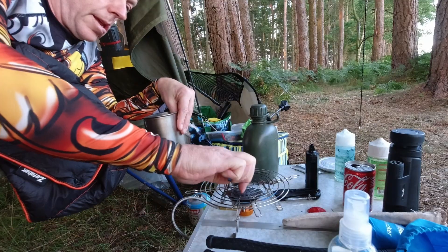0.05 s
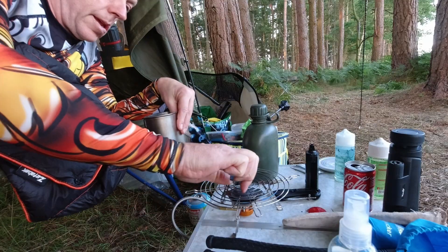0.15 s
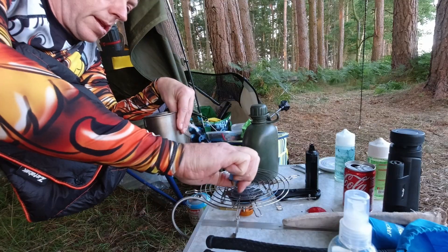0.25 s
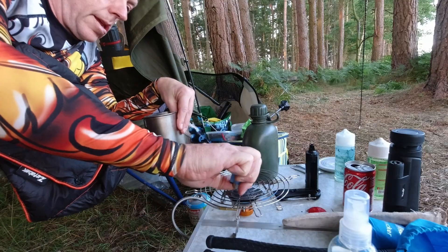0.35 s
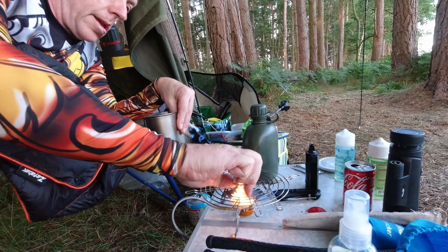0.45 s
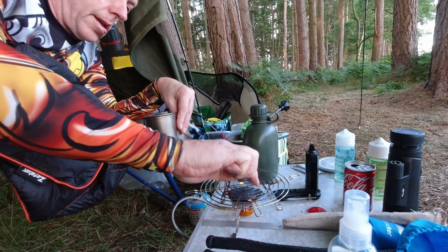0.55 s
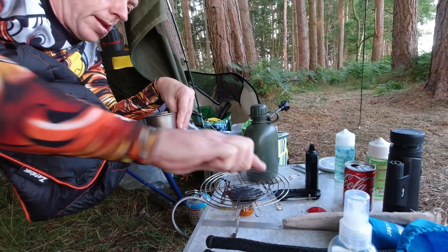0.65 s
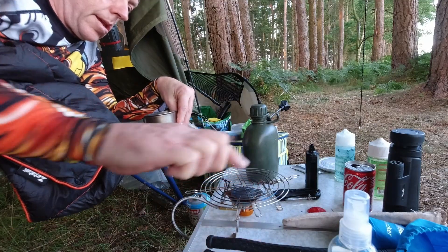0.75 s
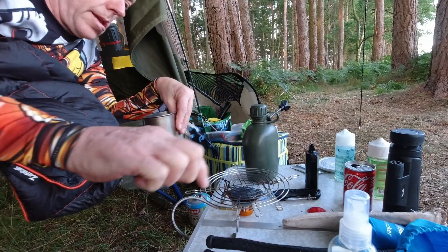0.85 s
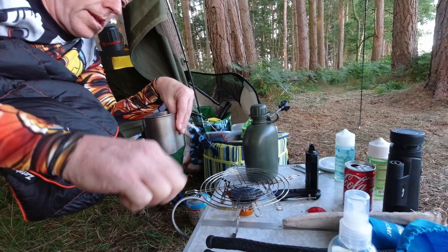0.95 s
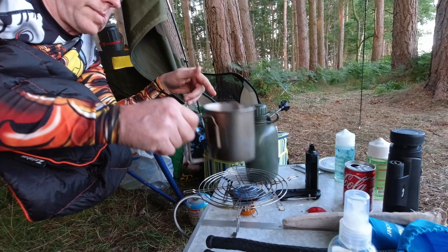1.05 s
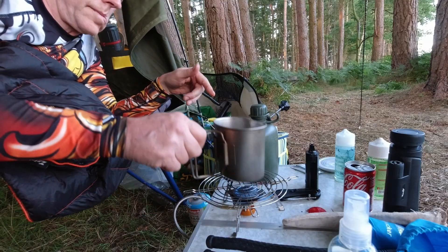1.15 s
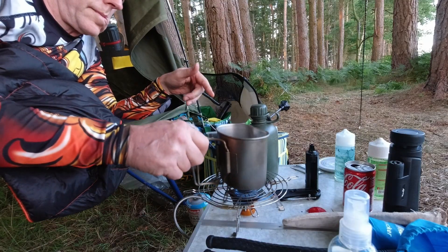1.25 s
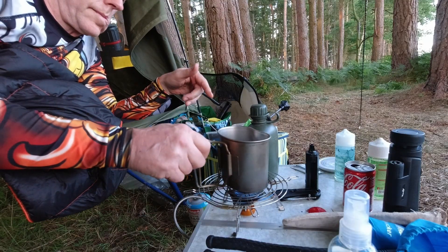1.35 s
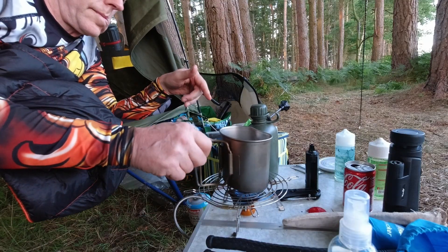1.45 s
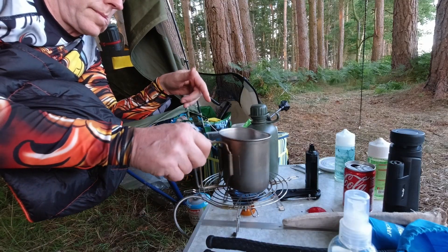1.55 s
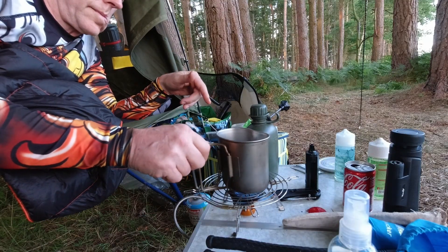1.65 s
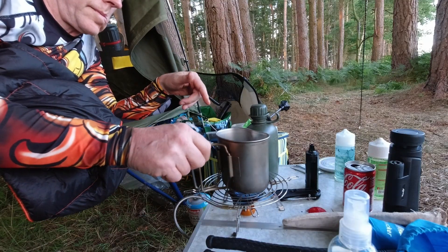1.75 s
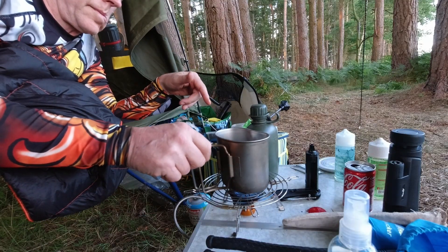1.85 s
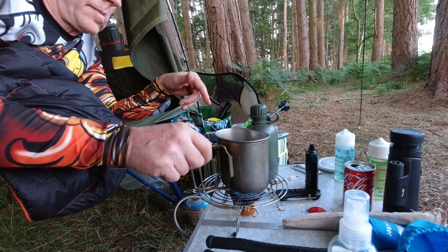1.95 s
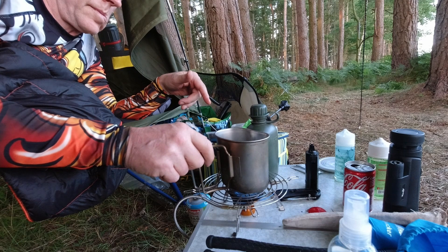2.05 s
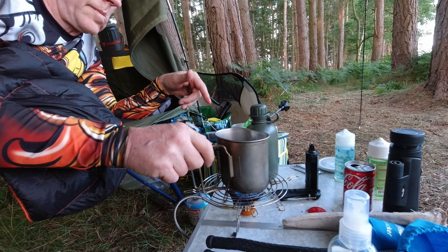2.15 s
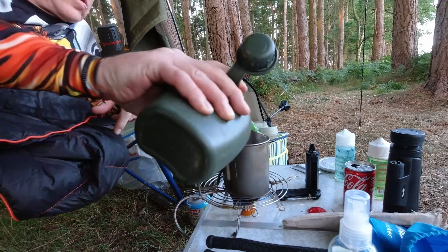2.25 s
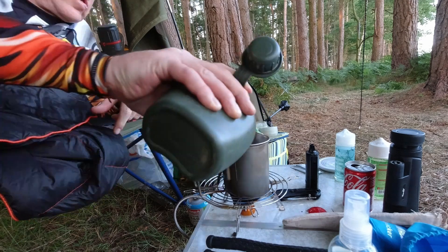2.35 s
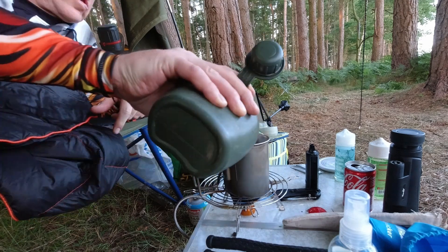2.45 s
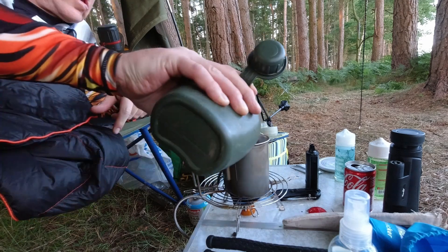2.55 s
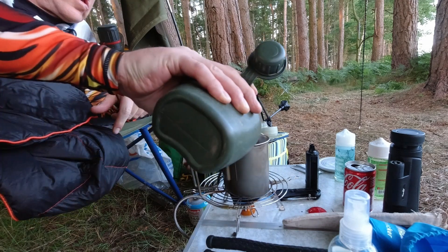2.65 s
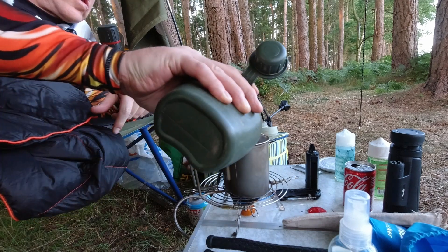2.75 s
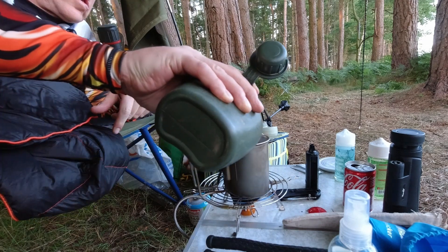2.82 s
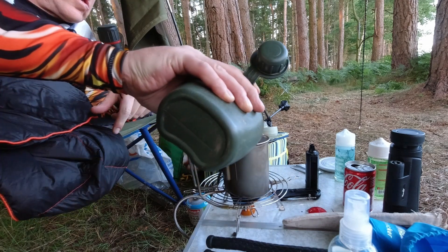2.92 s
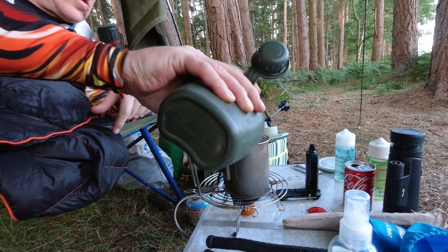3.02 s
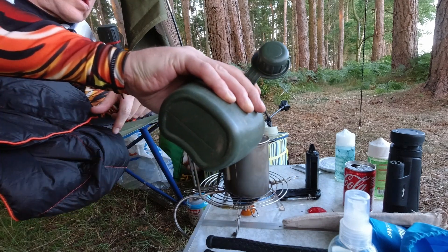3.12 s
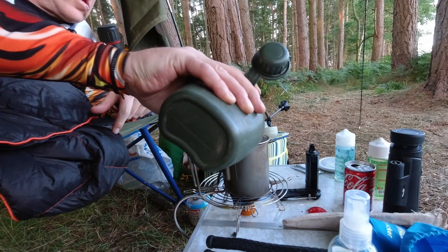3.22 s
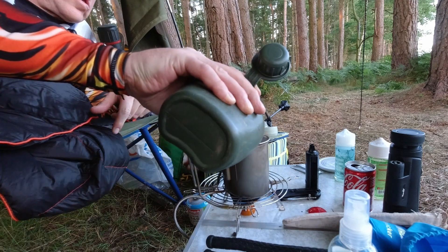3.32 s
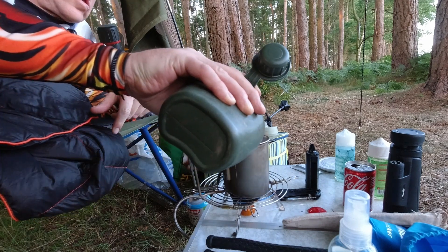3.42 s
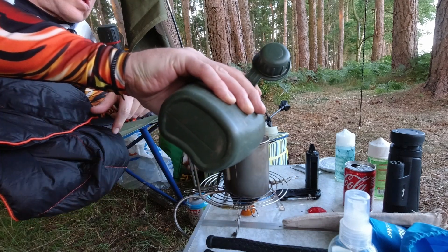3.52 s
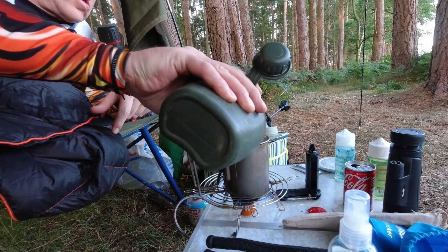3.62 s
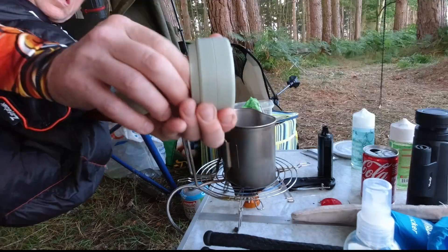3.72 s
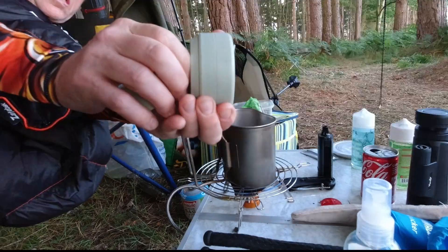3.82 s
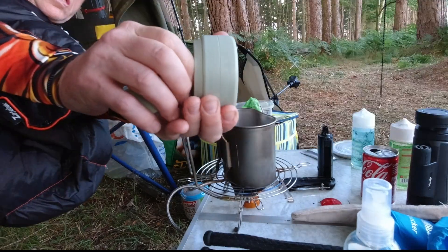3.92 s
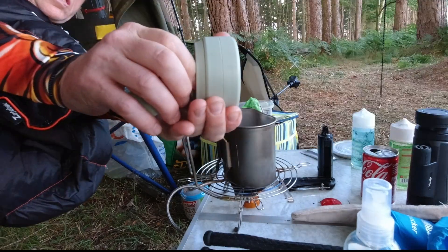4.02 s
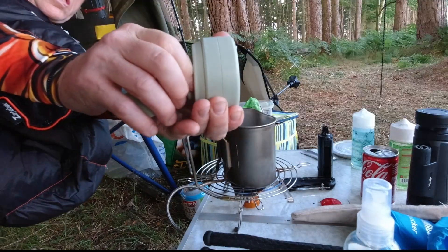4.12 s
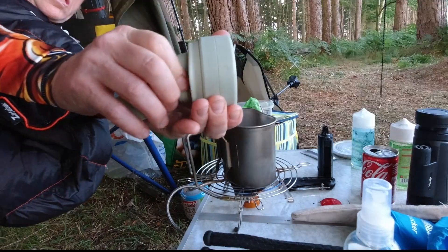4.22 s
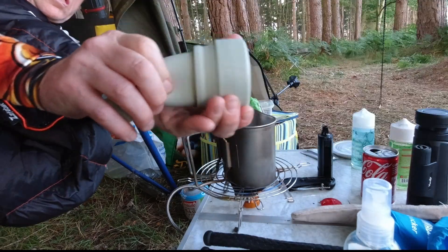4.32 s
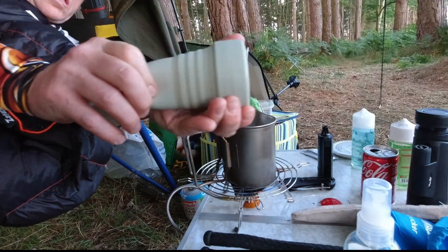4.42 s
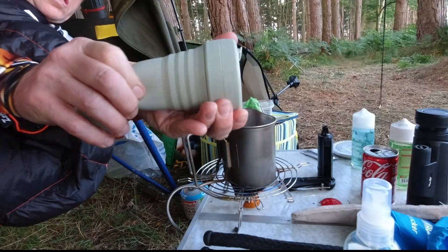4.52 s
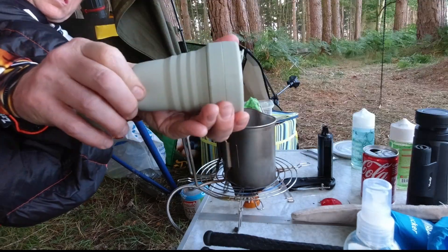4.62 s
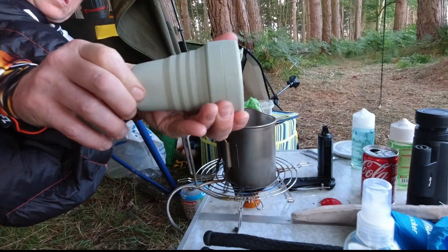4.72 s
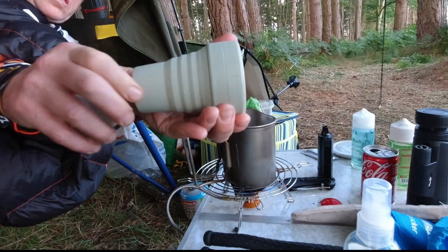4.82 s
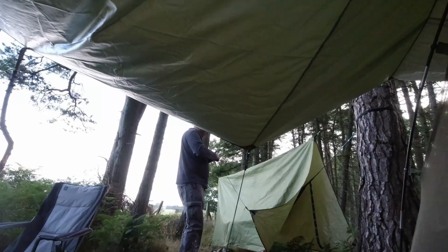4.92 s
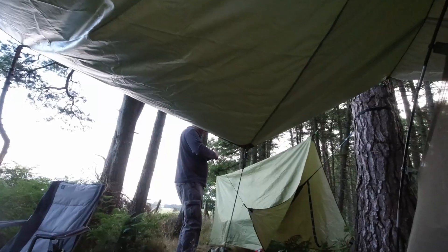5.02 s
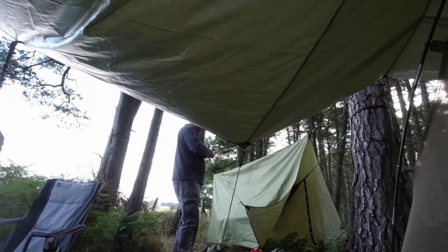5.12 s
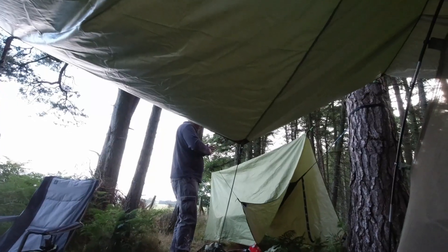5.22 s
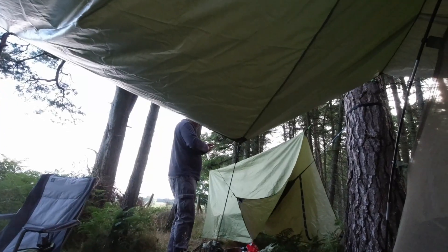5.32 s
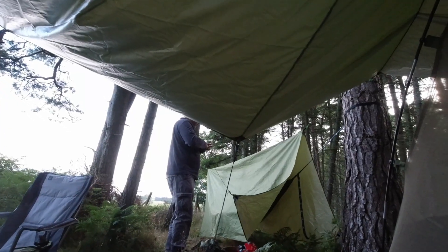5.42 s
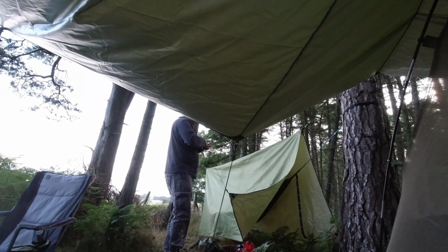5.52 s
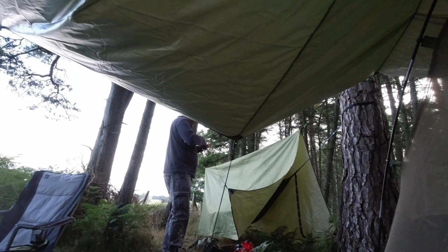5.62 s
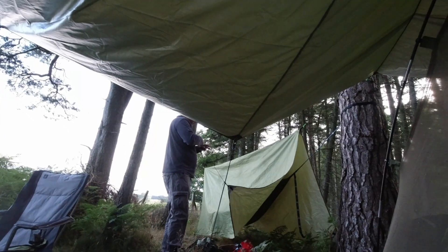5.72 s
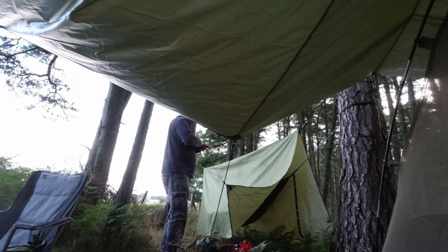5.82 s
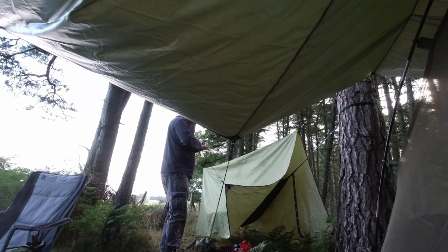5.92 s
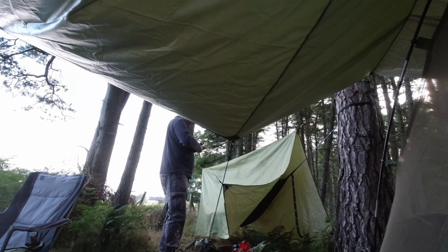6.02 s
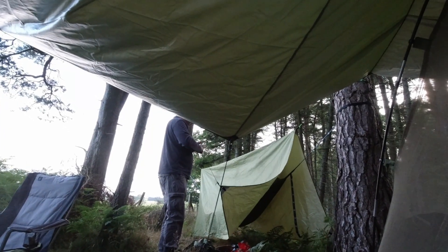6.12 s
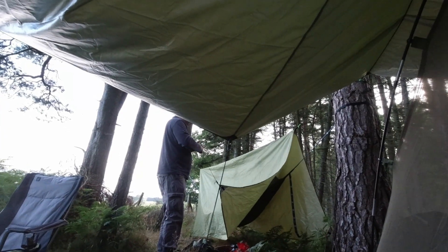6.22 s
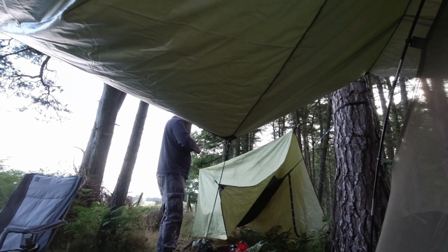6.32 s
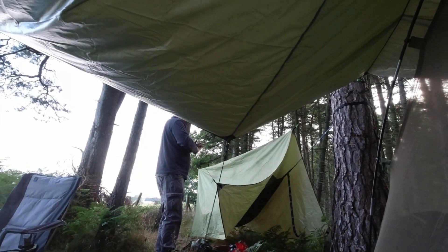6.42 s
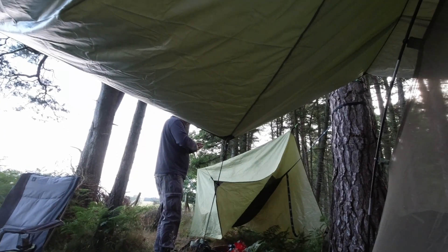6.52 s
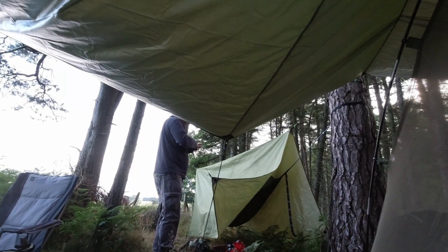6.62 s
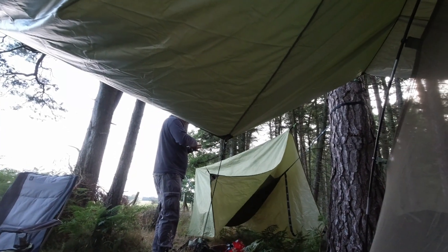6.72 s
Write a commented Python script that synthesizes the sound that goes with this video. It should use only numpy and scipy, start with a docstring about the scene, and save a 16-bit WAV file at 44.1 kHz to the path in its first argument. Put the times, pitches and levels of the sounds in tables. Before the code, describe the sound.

A gas stove lights with a click and soft whump, a metal mug clanks and scrapes, water glugs in, a rubber cup pops open.

```python
"""A far low roar and a faint hiss come first and lie under it all, with small ticks and rustling sleeves.
Then a gas stove is lit: shaped noise hisses and thumps. A metal mug is knocked and slid on a wire stand,
which sets the ringing tones of both going. Water from a glugging canteen is resonant noise, gliding gulps
and short pings. Last, a folding rubber cup opens ring by ring with hollow pops and bright snaps."""
import sys
import numpy as np
from scipy import signal
from scipy.io import wavfile
from scipy.ndimage import uniform_filter1d

SR = 44100
rng = np.random.default_rng(int(sys.argv[2]) if len(sys.argv) > 2 else 0)


def generate_wav(signal):
    """Clip the signal to [-1, 1] and save it as 16-bit WAV at the path in sys.argv[1]."""
    frames = np.transpose(np.atleast_2d(signal))
    scaled = np.clip(frames, -1, 1) * 32767
    pcm = np.round(scaled).astype(np.int16)
    wavfile.write(sys.argv[1], SR, pcm)


N = 298116   # length in samples


def amp(db):
    """Turn decibels into a factor."""
    return 10 ** (np.asarray(db) / 20)


def rms_one(x):
    """Scale a signal to an average strength (rms) of 1."""
    return x / np.sqrt(np.mean(x ** 2) + 1e-20)


def filtered(x, order, hz, kind="low"):
    """Keep the part of the sound below, above or between the given frequencies."""
    return signal.sosfilt(signal.butter(order, hz, kind, fs=SR, output="sos"), x)


def add(out, s, piece):
    """Lay a short sound into a long one, starting at s seconds."""
    i = round(s * SR)
    out[i:i + len(piece)] += piece[:N - i]


def in_time(rows):
    """Draw straight lines through the rows of a table, whose first column is the time."""
    s, *columns = np.transpose(rows)
    return [np.interp(np.arange(N) / SR, s, c) for c in columns]


def drift(rate):
    """Slow random wandering around 0 with a spread of 1; a higher rate wanders faster."""
    steps_per_s = 60
    steps = rng.standard_normal(int(N / SR * steps_per_s) + 2)
    slow = uniform_filter1d(steps, max(1, round(30 / rate)))
    return np.interp(np.arange(N) / SR * steps_per_s, np.arange(len(slow)), rms_one(slow))


def swell(s, db, rise_s, hold_s, fall_s):
    """Gain that climbs 30 dB in the rise time, is full at s, holds, and sinks 30 dB in the fall time."""
    t = np.arange(N) / SR - s
    lost = np.maximum(-t / rise_s, 0) + np.maximum((t - hold_s) / fall_s, 0)
    return amp(db - 30 * np.minimum(lost, 6))


def swells(rows):
    """Gains of several swells, added up."""
    return sum(swell(*row) for row in rows)


def noise(spectrum, patchy_db, tilt_db=0):
    """Third-octave bands of noise, each with its level and flicker; tilt per octave turns about 3 kHz."""
    hz, db = np.transpose(spectrum)
    edges = np.geomspace(hz[0], hz[-1], int(3 * np.log2(hz[-1] / hz[0])) + 1)
    white, out = rng.standard_normal((2, N)), 0
    for k, (low, high) in enumerate(zip(edges, edges[1:])):
        band = filtered(white[k % 2], 2, [low, high], "band")
        mid = np.sqrt(low * high)
        level_db = np.interp(np.log(mid), np.log(hz), db) + tilt_db * np.log2(mid / 3000)
        out = out + band * amp(level_db + patchy_db * drift(10))
    return rms_one(out)


def grains(per_s, spread_db):
    """Random clicks of uneven size and either sign, rms 1."""
    sizes = amp(spread_db * np.minimum(rng.exponential(1, N), 4)) * rng.choice([-1, 1], N)
    return rms_one(sizes * (rng.random(N) < per_s / SR))


def ring(clicks, hz, t60):
    """A unit click sets a sine of about height 1 ringing, which sinks 60 dB in t60 seconds."""
    r, w = amp(-60 / (t60 * SR)), 2 * np.pi * hz / SR
    return signal.lfilter([0, np.sin(w)], [1, -2 * r * np.cos(w), r * r], clicks + 1e-18)


def resonances(x, peaks, flicker_db):
    """Noise or clicks through a few fixed resonances, each flickering; a wider one rings shorter."""
    out = 0
    for hz, width, db in peaks:
        tone = rms_one(ring(x, hz, 2.2 / width))
        out = out + amp(db + flicker_db * drift(25)) * tone
    return rms_one(out)


def ping(db, hz, t60, crack_db, crack_s=0.0013, rough=0.23, swell_cycles=2.0, top_hz=4500.):
    """A wavering sine that swells for some cycles and dies, with a short dull burst of noise at its start."""
    t = np.arange(int(.25 * SR)) / SR
    waver = 1 + rough * rms_one(uniform_filter1d(rng.standard_normal(len(t)), size=150))
    rise = np.minimum(t * hz / swell_cycles, 1)
    decay = amp(-60 * np.maximum(t - swell_cycles / hz, 0) / t60)
    burst = filtered(rng.standard_normal(len(t)) * np.exp(-t / crack_s), 3, [400., top_hz], "band")
    return amp(db) * (amp(crack_db) * burst - waver * rise * decay * np.sin(2 * np.pi * hz * t))


# Levels of the background. Each row: time in seconds, far roar in dB, hiss in dB.
AIR_LEVELS = [(0, -61, -56), (.12, -59, -56), (.45, -61.5, -59), (.75, -54.5, -55), (1.4, -49.5, -60),
              (2.15, -51, -57.5), (2.45, -46.5, -58.5), (3.75, -46, -53.5), (4.2, -46, -56),
              (4.62, -50, -56), (4.71, -55, -69.5), (4.86, -56, -68.5), (5.0, -53, -60.5),
              (5.3, -49.5, -57.5), (6.76, -49, -60)]
# Colour of the far roar. Each row: frequency in Hz, relative level in dB per Hz.
ROAR_COLOUR = [(15, -33), (25, -8.5), (167, -9.5), (265, -5), (379, 0.5), (626, -14.5), (749, -16),
               (849, -23), (945, -10), (1300, -41), (1800, -42), (2340, -57), (3960, -120)]
# Colour of the hiss before its tilt. Each row: frequency in Hz, relative level in dB per Hz.
HISS_COLOUR = [(710, 12), (1200, 4.5), (1850, 3), (2200, -4.5), (2620, 9), (2980, -18.5), (3470, 0.5),
               (5710, -16.5), (6650, -14), (7740, -22), (9410, -22.5), (15200, -34), (16000, -30)]
# Swell of steady thin bands in the hiss at the tent. One row: time at full level in seconds,
# level in dB, then rise, hold and fall in seconds.
TENT_SWELL = (5.1, -64, .45, 2.5, .1)
# Those thin bands. Each row: frequency in Hz, width in Hz, relative level in dB.
TENT_BANDS = [(2950, 350, 0), (4560, 150, -9), (5200, 200, -9), (5550, 200, -10)]
HISS_TILT_DB = 4   # per octave


def background():
    """Far roar and hiss are smooth noise; narrow resonances of noise add thin bands of hiss."""
    roar_db, hiss_db = in_time(AIR_LEVELS)
    roar = amp(roar_db) * noise(ROAR_COLOUR, patchy_db=.8)
    hiss = amp(hiss_db) * noise(HISS_COLOUR, patchy_db=2.5, tilt_db=HISS_TILT_DB)
    bands = resonances(rng.standard_normal(N), TENT_BANDS, flicker_db=1.5)
    return roar + hiss + swell(*TENT_SWELL) * bands


# Hisses of the gas jet and swishes of sleeves. Each row: time at full level in seconds, level in dB,
# then rise, hold and fall in seconds.
RUSTLES = [(0.546, -46, 0.14, 0, 0.036), (.572, -27.5, 0.018, 0.0051, 0.031),
           (0.588, -37, .01, 0.063, 0.051), (0.866, -35, 0.1, .065, 0.12), (1.0, -51, 0.37, 0.22, 0.51),
           (3.968, -45.5, 0.01, 0, 0.11), (4.195, -51.5, 0.17, .15, 0.016), (4.498, -50, .05, 0.14, 0.1),
           (5.025, -51.5, 0.41, 0.057, 0.21)]
# Colour of the rustling, also of the cup's puffs. Each row: frequency in Hz, relative level in dB per Hz.
RUSTLE_COLOUR = [(180, -61), (300, -13), (360, -3), (398, -37), (433, -14.5), (762, -2.5), (994, -4.5),
                 (1580, -11), (2610, 2.5), (4830, -15), (7690, -14.5), (14500, -51), (16000, -69)]


def gas_jet_and_sleeves():
    """Rushing gas and rubbing cloth are both swells of bright, patchy noise."""
    return swells(RUSTLES) * noise(RUSTLE_COLOUR, patchy_db=3.0)


# Igniter and small ticks. Each row: start in seconds, level of the tone in dB, pitch in Hz,
# time to sink 60 dB in seconds.
TICK_LIST = [(.002, -45.5, 8700, 0.079), (0.209, -39, 2930, .016), (.2098, -38, 4030, 0.014),
             (0.5083, -39, 2550, 0.038), (.535, -31.5, 2710, 0.034), (0.537, -53, 8360, 0.11),
             (0.542, -30, 3020, 0.038), (0.5667, -18.5, 3250, .02), (0.57, -31.5, 5440, 0.042),
             (.572, -25, 3460, 0.061), (.753, -36, 270, .014)]
TICK_CRACK_DB, TICK_CRACK_FOLLOWS = 15.5, 1   # harder ticks crack more


def ticks():
    """Each small tick is a rough, short ringing tone with a crack of noise."""
    out = np.zeros(N)
    for s, db, hz, t60 in TICK_LIST:
        crack_db = TICK_CRACK_DB + TICK_CRACK_FOLLOWS * db
        add(out, s, ping(db, hz, t60, crack_db, crack_s=0.0036, rough=0.96, top_hz=8300.0))
    return out


# The gas catches. One row: time at full level in seconds, level in dB, then rise, hold and fall in seconds.
IGNITION_SWELL = (.592, -27.5, .04, .043, .022)
# Colour of the flame's thump. Each row: frequency in Hz, relative level in dB per Hz.
FLAME_COLOUR = [(18, -50), (30, -14), (140, 6), (292, -4), (469, -6), (610, -3.5), (874, -13), (1500, -15),
                (1950, -49), (3300, -120)]


def ignition():
    """The catching gas is turbulent: a brief thump of patchy low noise."""
    return swell(*IGNITION_SWELL) * noise(FLAME_COLOUR, patchy_db=4.5)


# Drags of the mug on the stand. Each row: time at full level in seconds, level in dB,
# then rise, hold and fall in seconds, share of the stand's wires from 0 to 1.
DRAGS = [(1.428, -13, 0.0039, 0.045, .13, 0.04), (1.665, -28, 0.053, 0.013, 0.066, .35),
         (1.69, -25, .02, 0.0087, .06, 0.4), (1.729, -14, 0.028, 0.005, 0.044, 0.05),
         (1.79, -17.5, .04, 0, 0.042, 0.1), (1.827, -16.5, 0.068, 0, 0.13, .45),
         (1.962, -21.5, .022, 0.0081, 0.095, 1)]
# Knocks of the mug on the stand. Each row: time in seconds, strength in dB,
# share of the stand's wires from 0 to 1, favoured pitch in Hz, second favoured pitch in Hz.
KNOCK_LIST = [(1.428, -10, 0.28, 1290, 3660), (1.465, -20, 1, 860, 1290), (1.611, -31.5, 0.15, 3220, 1040),
              (1.656, -24.5, 0.26, 2560, 3020), (1.69, -21, 0.2, 1042, 2250),
              (1.725, -17.5, 0.9, 3100, 2780), (1.782, -40, 0.5, 540, 1860), (1.808, -25, 1, 1860, 3270),
              (1.831, -28, 0.9, 850, 1880), (1.958, -11, 0.97, 2400, 5650), (1.985, -23.5, 0.75, 1750, 620)]
# Ringing tones (modes) of the mug. Each row: pitch in Hz, relative level in dB,
# seconds to sink 60 dB before the shortening below.
MUG_MODES = [(237, -8, .25), (544, -4, .29), (619, -9, .21), (856, -10, .35), (905, -13, .2),
             (1044, -8, .22), (1292, -21, 1.2), (1561, -24, .6), (2245, -16, .6), (2557, -14, .4),
             (2772, -13, .29), (2832, -18, .4), (3063, -14, .45), (3149, -4, .24), (3666, -7, .3),
             (3822, -20, .5), (3967, -20, .3), (4247, -7, .25), (4565, -20, .27), (4700, -19, .25),
             (4915, -16, .2), (5030, -19, .45), (5160, -16, .25), (5389, -24, .4), (5739, -24, .6),
             (6939, -28, .27), (7413, -24, .15), (7741, -23, .19), (8559, -21, .12), (9900, -22, .1),
             (11100, -20, .1)]
# Ringing tones of the wire stand. Each row: pitch in Hz, relative level in dB,
# seconds to sink 60 dB before the shortening below.
STAND_MODES = [(673, 0, 0.092), (1803, -5, 0.15), (2363, -7, 0.13), (2729, -11, 0.19), (3085, -2, 0.088),
               (3198, -5, 0.14), (3273, -6, 0.1), (3440, -15, 0.2), (3731, -29, 0.19), (4651, -18, 0.11),
               (4947, -31, 0.23), (5432, -25, 0.16), (6315, -27, 0.11), (7041, -26, 0.1), (7467, -34, 0.2),
               (7870, -21, 0.074), (1857, -6, .22), (2600, -3, .12), (5650, -12, .09)]
# How well tones get out into the air. Each row: frequency in Hz, gain in dB.
RADIATION_GAIN = [(200, -0.5), (500, 1), (900, 1.5), (1300, 2.5), (1900, -6), (2700, -0.5), (3700, -6),
                  (5000, -10.5), (8000, 3.5), (11000, -1.5)]
# Colour of the scrape. Each row: frequency in Hz, relative level in dB per Hz.
SCRAPE_COLOUR = [(35, -38), (60, -36), (198, 1.5), (323, -6.5), (540, -6), (968, 2), (1200, -27),
                 (1310, -9), (1470, -18.5), (3120, -9), (6280, -40), (11300, -48), (16000, -62)]
GRIP_S = 1.62   # fingers close on the mug: the ringing so far is stopped
GRIPPED_HZ = 4930   # and the rubbing is softened above this
TREBLE_DIES_HZ = 5100   # modes above this die sooner, in proportion


def mug_on_stand():
    """Knocks and the stick-slip of dragging shake the modes of mug and stand."""
    drags = np.array([swell(*row[:5]) for row in DRAGS])
    drag = drags.sum(axis=0)
    wires = np.clip(np.transpose(DRAGS)[5], 0, 1) @ drags / drag
    s, db, share, *favoured_hz = np.transpose(KNOCK_LIST)
    at, share = (s * SR).astype(int), np.clip(share, 0, 1)
    radiation_hz, radiation_db = np.transpose(RADIATION_GAIN)
    t = np.arange(N) / SR
    busy = slice(at[0] - SR // 10, at[-1] + SR // 2)   # only this stretch is computed
    free = t < GRIP_S
    grip_gain = amp(-700 * np.maximum(t - GRIP_S, 0))
    rub, out = drag * grains(1500, 2.8), np.zeros(N)
    rub = np.where(free, rub, filtered(rub, 2, GRIPPED_HZ))
    for modes, rubbed, struck in ((MUG_MODES, 1 - wires, 1 - share), (STAND_MODES, wires, share)):
        for hz, level_db, t60 in modes:
            t60 = t60 * min(TREBLE_DIES_HZ / hz, 1)
            force = amp(-38.5) * rub * rubbed * amp(3.1 * drift(15))
            # the place of the blow favours the modes near two pitches
            distance = np.log(hz / np.array(favoured_hz)) / .04
            near_db = 8 * np.exp(-distance ** 2).max(axis=0)
            blow_db = db - 10.5 + near_db + rng.normal(0, 4.5, len(at))
            lag = rng.integers(0, 160, len(at))   # the contact chatters for a few ms
            force[at + lag] += struck * amp(blow_db) * rng.choice([-1, 1], len(at))
            gain = amp(level_db + np.interp(np.log(hz), np.log(radiation_hz), radiation_db))
            early = ring((force * free)[busy], hz, 0.57 * t60)
            late = ring((force * ~free)[busy], hz, min(0.67 * t60, .2))
            out[busy] += gain * (grip_gain[busy] * early + late)
    out = filtered(out, 4, 12000.)
    # each knock also has a short crack
    for when, strength_db in zip(s, db):
        add(out, when, ping(strength_db - 24, 3000, .01, 8, crack_s=.005, top_hz=8000.))
    # the scrape itself is heard beside the ringing
    return out + amp(-13) * drag * noise(SCRAPE_COLOUR, patchy_db=3)


# Surges of the stream. Each row: time at full level in seconds, level on the wall in dB, level on the water in dB.
STREAM_SURGES = [(2.55, -75, -45.5), (2.675, -51, -39), (2.76, -30, -33.5), (2.868, -50.5, -28),
                 (2.964, -41, -50), (3.08, -53, -40.5), (3.2, -50.5, -44), (3.25, -50, -43),
                 (3.33, -55, -39), (3.378, -41.5, -38), (3.44, -46.5, -42), (3.52, -44.5, -47),
                 (3.6, -39.5, -72)]
SURGE_RISE_S, SURGE_HOLD_S, SURGE_FALL_S = 0.066, 0.011, 0.11


def surges(column):
    """Gain of the stream, surge by surge, from one column of levels: 1 for wall, 2 for water."""
    return swells((row[0], row[column], SURGE_RISE_S, SURGE_HOLD_S, SURGE_FALL_S) for row in STREAM_SURGES)


# Resonances of the air column in the mug. Each row: pitch in Hz, width in Hz, relative level in dB.
COLUMN_PEAKS = [(826.5, 19, 9), (580, 120, -8)]
# Resonances of the mug's wall. Each row: pitch in Hz, width in Hz, relative level in dB.
WALL_PEAKS = [(1986, 23, -8), (2230, 80, -5), (2782, 114, 5), (3060, 74, 0), (3440, 91, -6),
              (5100, 1700, -16)]
# Colour of water falling on water. Each row: frequency in Hz, relative level in dB per Hz.
SPLASH_COLOUR = [(350, 4), (550, 17.5), (800, -1), (1300, -15), (2000, -1.5), (3500, -16), (6000, -56)]
# The air column sings on once the mug is half full. One row: time at full level in seconds,
# level in dB, then rise, hold and fall in seconds.
SINGING_SWELL = (3.395, -36, .04, .19, .16)
COLUMN_DB = -9   # air column under each surge, against the water


def stream():
    """The stream drums on wall and air column as random clicks, and splashes on water as noise."""
    wall, water = surges(1), surges(2)
    column = amp(COLUMN_DB) * water + swell(*SINGING_SWELL)
    out = column * resonances(grains(1300, 0.84), COLUMN_PEAKS, flicker_db=5.0)
    out += wall * resonances(grains(1500, 1.9), WALL_PEAKS, flicker_db=5.0)
    return out + water * noise(SPLASH_COLOUR, patchy_db=5.5)


# First water hisses on the hot bare bottom. Each row: time at full level in seconds, level in dB,
# then rise, hold and fall in seconds.
JET_SWELLS = [(2.661, -38.5, 0.057, .04, 0.11), (2.756, -27.5, 0.089, 0.011, 0.072)]
# Resonances of the mug's bottom. Each row: pitch in Hz, width in Hz, relative level in dB.
BOTTOM_PEAKS = [(1880, 10, -12), (2230, 46, -34), (2850, 25, 4.5), (3426, 57, 2.5), (5040, 55, -7.5),
                (5310, 29, -12), (6030, 45, -37), (6830, 100, -28), (7700, 84, -10)]
# Colour of the sizzle. Each row: frequency in Hz, relative level in dB per Hz.
SIZZLE_COLOUR = [(710, -55), (1200, -40), (1640, -30), (2200, -17), (2510, -25), (2760, 16), (4360, -18),
                 (7910, -7.5), (16000, -36)]


def jet_on_bottom():
    """The first water rings the bottom's resonances with random clicks and sizzles as noise."""
    ringing = resonances(grains(4000, 2.5), BOTTOM_PEAKS, flicker_db=3)
    return swells(JET_SWELLS) * (ringing + amp(-6) * noise(SIZZLE_COLOUR, patchy_db=2.5))


# Bright spray drops. Each row: earliest start in seconds, highest level in dB, middle pitch in Hz.
SPRAY_DROPS = [(2.8777, -39, 4200), (2.9551, -39, 8300), (2.968, -40, 5160), (3.0274, -50, 7650),
               (3.0514, -52, 7240), (3.0967, -49, 8000), (3.1362, -48.5, 7650), (3.139, -45.5, 4500),
               (3.2185, -50, 4760), (3.2384, -48, 5620), (3.3402, -50, 10600), (3.3527, -47, 5670),
               (3.421, -71, 4700), (3.431, -48, 6130), (3.5093, -50.5, 8390), (3.5303, -40, 4930),
               (3.5943, -47.5, 6030), (3.7, -52, 4640)]


def spray():
    """One drop breaks into four of nearby sizes, each a rough, short ping."""
    out = np.zeros(N)
    for s, db, hz in SPRAY_DROPS:
        for late, size, weak in rng.random((4, 3)):
            pitch = hz * 2 ** (.3 * size - .15)
            piece = ping(db - 8 * weak, pitch, .03, -12, rough=.9, swell_cycles=4, top_hz=10000.)
            add(out, s + .025 * late * late, piece)
    return out


def bubbles():
    """A random crowd of small bubbles: short sines of rising pitch, as loud as the stream on the wall allows."""
    out, wall = np.zeros(N), surges(1)
    t = np.arange(int(.05 * SR)) / SR
    for late, high, weak in rng.random((200, 3)):
        s, hz = 2.85 + .85 * late, 900 * 2 ** (2.4 * high)
        level_db = 10.5 - 14 * weak - 4 * high
        decay_db = hz / 50 * 60 * t   # 60 dB in 50 cycles
        tone = np.sin(2 * np.pi * hz * t * (1 + 2.5 * t))
        add(out, s, wall[int(s * SR)] * amp(level_db - decay_db) * tone)
    return out


# Drops and small bubbles. Each row: start in seconds, level in dB, pitch in Hz, time to sink 60 dB in seconds.
DROP_LIST = [(2.523, -41.5, 2760, .02), (2.614, -43, 1030, 0.2), (2.746, -22.5, 2240, .05),
             (2.765, -17, 2760, 0.012), (2.848, -28, 1510, 0.0069), (2.849, -26, 2360, 0.046),
             (2.877, -24, 2090, .02), (2.9, -40, 1100, .01), (2.907, -33, 2030, 0.03),
             (2.95, -29, 2740, .05), (2.965, -16, 2980, 0.033), (2.985, -23, 3470, 0.045),
             (3.004, -39.5, 2330, 0.18), (3.045, -22.5, 2906, .13), (3.191, -41, 1400, 0.059),
             (3.218, -35, 2100, 0.074), (3.236, -37, 1260, .013), (3.262, -33, 2685, 0.27),
             (3.28, -20, 2760, .025), (3.29, -24, 2780, 0.091), (3.307, -22, 1910, 0.039),
             (3.307, -22, 1086, 0.067), (3.352, -35, 2430, 0.033), (3.393, -29, 1837, 0.26),
             (3.42, -23.5, 1842, 0.14), (3.455, -34, 2334, 0.13), (3.542, -36, 1800, 0.15),
             (3.595, -37, 3000, 0.034), (3.694, -39.5, 2520, 0.023)]
DROP_CRACK_DB = -31   # against the drop's tone


def drops():
    """Each drop or small bubble is a wavering ping with a faint crack."""
    out = np.zeros(N)
    for s, db, hz, t60 in DROP_LIST:
        add(out, s, ping(db, hz, t60, DROP_CRACK_DB, rough=0.35, swell_cycles=1.26))
    return out


PINCH_HZ = 683   # a lower gulp glides up towards this pitch


def gulp(db, hz, length):
    """A pocket of air rings, rising in pitch as it pinches off."""
    u = np.arange(int(2 * length * SR)) / SR / length   # time in gulp lengths
    pitch = hz * max(PINCH_HZ / hz, 1.04) ** (u ** 1.45)
    shape = np.minimum(u / 0.068, 1) * np.exp(-.6 * u - u ** 4)
    return amp(db) * shape * np.sin(2 * np.pi * np.cumsum(pitch) / SR)


# Air gulps into the canteen. Each row: start in seconds, level in dB, starting pitch in Hz, length in seconds.
GULP_LIST = [(2.507, -35.5, 532, 0.047), (2.735, -23.5, 584, 0.011), (2.746, -23, 397, 0.018),
             (2.86, -15, 616, 0.019), (2.877, -24, 381, 0.04), (3.004, -28.5, 600, 0.0091),
             (3.027, -29, 382, 0.044), (3.191, -21, 597, 0.011), (3.212, -28.5, 374, 0.043),
             (3.238, -28, 734, 0.019), (3.351, -14, 640, 0.0055), (3.361, -28.5, 703, 0.021),
             (3.371, -27.5, 370, 0.043), (3.439, -29.5, 423, 0.048)]
SLOSH_DB, SLOSH_RISE_S, SLOSH_FALL_S = -23, 0.091, 0.12   # low slosh around each gulp, against its level


def canteen():
    """Each gulp of air is a gliding tone, with a slosh of low, patchy noise around it."""
    slosh = swells((s, db + SLOSH_DB, SLOSH_RISE_S, 0, SLOSH_FALL_S) for s, db, *_ in GULP_LIST)
    out = slosh * noise([(45, 0.1), (100, 0), (350, 0.8)], patchy_db=8.5)
    for s, db, hz, length in GULP_LIST:
        add(out, s, gulp(db, hz, length))
    return out


# Rubber rings snap over. Each row: start in seconds, hollow pop in dB, its pitch in Hz,
# bright snap in dB, its pitch in Hz; the rubber then dulls both.
RING_POPS = [(3.926, -12, 746, -22.5, 2700), (3.938, -22.5, 1030, -34, 2820), (3.968, -48, 624, -32, 2700),
             (4.2723, -23.5, 860, -18, 2670), (4.323, -21.5, 730, -36, 2750), (4.377, -23, 476, -30, 2970),
             (4.381, -18, 990, -3.5, 2630), (4.383, -15, 746, -9, 3370), (4.416, -23, 970, -15, 3520),
             (4.426, -18, 860, -12, 2880), (4.429, -23.5, 507, -20, 3050), (4.4504, -13, 1070, -9, 2750),
             (4.457, -15.5, 432, -20.5, 1920), (4.462, -15, 640, -12, 2930), (4.4823, 1, 458, -16.5, 1060),
             (4.4982, -9, 308, -16.5, 707)]
# Low thumps of the last stretches in the hands. Each row: time at full level in seconds, level in dB,
# then rise, hold and fall in seconds.
HAND_THUMPS = [(4.421, -30, 0.022, .005, .03), (4.455, -27, 0.016, .005, .03),
               (4.487, -24, 0.0092, 0.018, 0.051)]
HOLLOW_CYCLES, HOLLOW_SWELL, SNAP_CYCLES = 15, 0.91, 28   # base ring and swell of hollow, ring of snap, in cycles
LOUD_DAMPING = 0.037   # share by which each dB of strength shortens the ring
PUFF_DB, PUFF_FOLLOWS, PUFF_FALL_S = -38, 0.49, 0.055   # bright puff after a snap; share of the snap's level


def folding_cup():
    """Each ring gives a hollow pop, a bright snap and a puff; the last stretches thump in the hands."""
    out, puffs = np.zeros(N), 0
    for s, hollow_db, hollow_hz, snap_db, snap_hz in RING_POPS:
        hollow_t60 = HOLLOW_CYCLES / hollow_hz * np.exp(-LOUD_DAMPING * (hollow_db + 13.5))
        snap_t60 = SNAP_CYCLES / snap_hz * np.exp(-LOUD_DAMPING * (snap_db + 15.5))
        hollow = ping(hollow_db, hollow_hz, hollow_t60, -62, rough=0.2, swell_cycles=HOLLOW_SWELL)
        snap = ping(snap_db, snap_hz, snap_t60, -25, crack_s=0.0011, swell_cycles=0.77)
        add(out, s, hollow + snap)
        puffs = puffs + swell(s, PUFF_DB + PUFF_FOLLOWS * snap_db, 0.0042, 0, PUFF_FALL_S)
    out = filtered(out, 2, 6000.)   # rubber is dull
    out += puffs * noise(RUSTLE_COLOUR, patchy_db=-2.5)
    return out + swells(HAND_THUMPS) * noise([(45, -13), (130, 2), (260, 7)], patchy_db=2.0)


SIDE_DB, SIDE_HZ = -49, 3500   # level of the faint treble copy, and where it starts


def scene():
    """Nearly mono: a very faint, wavering copy of the treble is added left and subtracted right."""
    mid = background() + gas_jet_and_sleeves() + ticks() + ignition() + mug_on_stand()
    mid = mid + stream() + jet_on_bottom() + spray() + bubbles() + drops() + canteen() + folding_cup()
    side = amp(SIDE_DB) * filtered(mid * drift(30), 4, SIDE_HZ, "high")
    return np.array([mid + side, mid - side])


CUTOFF_HZ = 16000   # from here up the sound is at least 70 dB weaker


def record(dry):
    """Rumble below 40 Hz and the top are cut."""
    firm = filtered(dry, 2, 40., "high")
    return signal.sosfilt(signal.cheby2(14, 70, CUTOFF_HZ, fs=SR, output="sos"), firm)


dry = scene()
out = record(dry)
generate_wav(out)
```